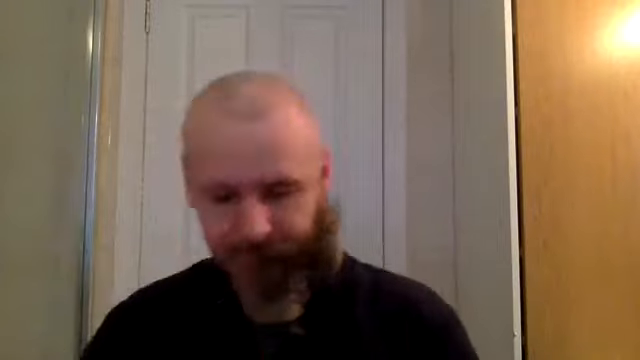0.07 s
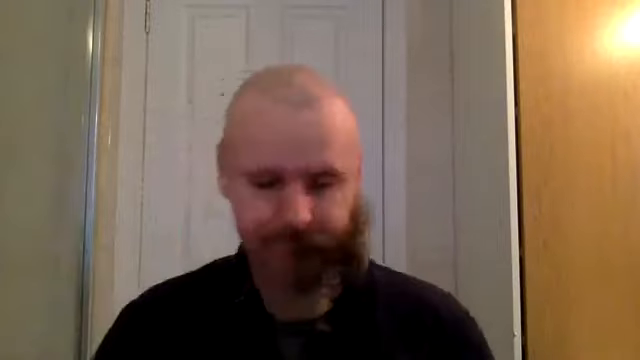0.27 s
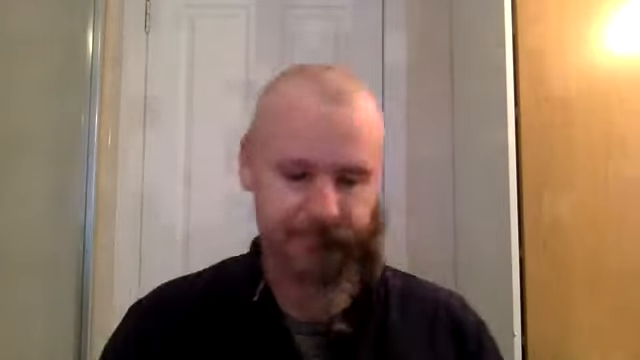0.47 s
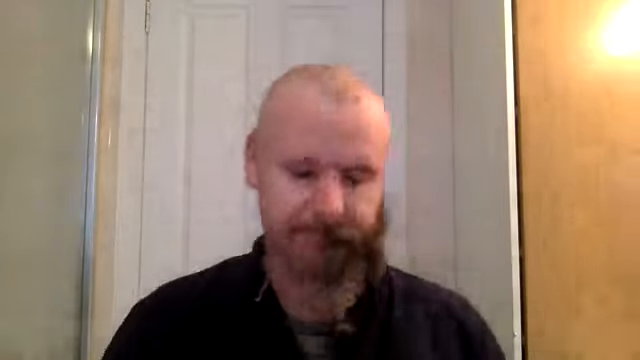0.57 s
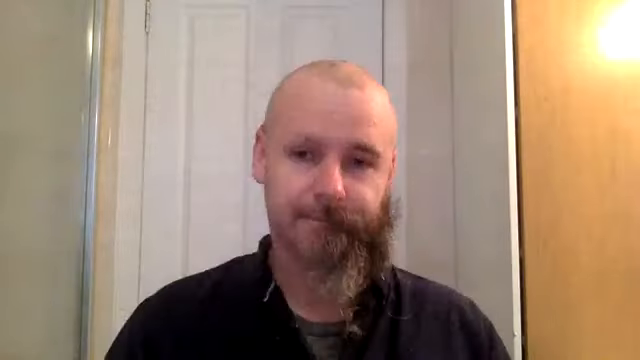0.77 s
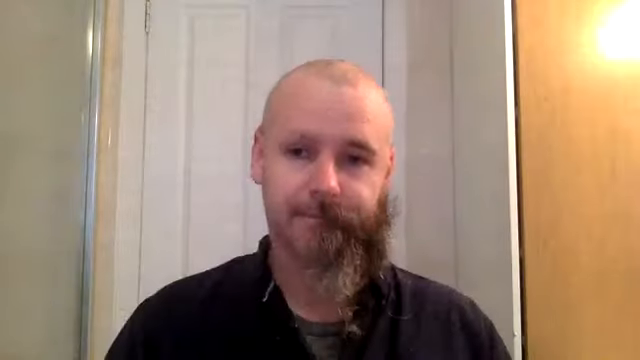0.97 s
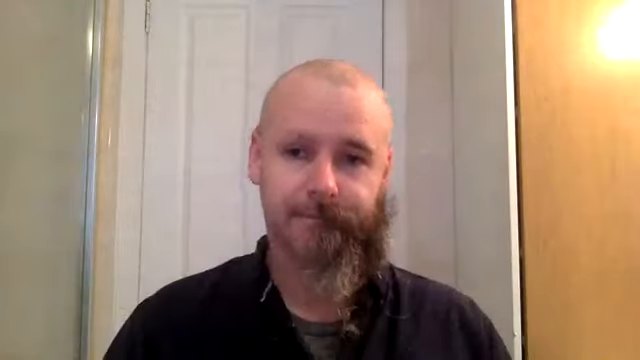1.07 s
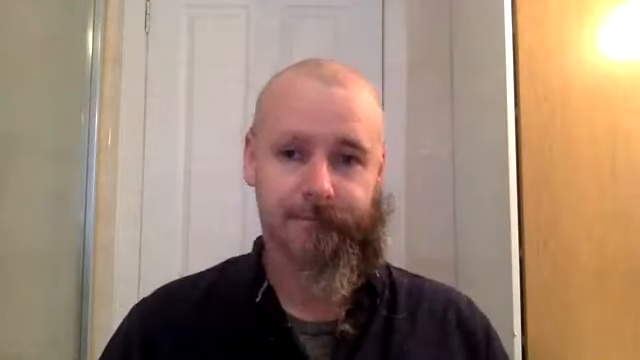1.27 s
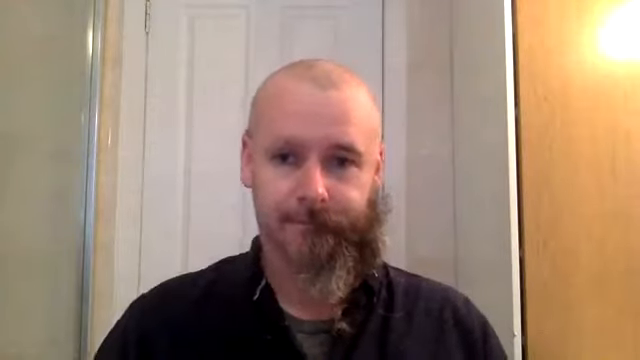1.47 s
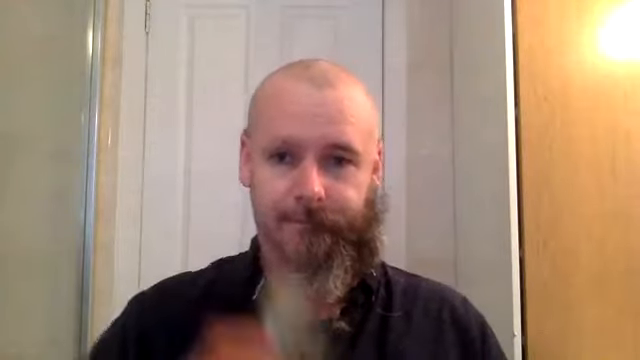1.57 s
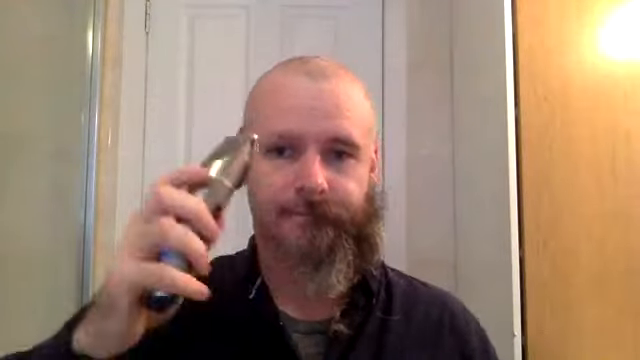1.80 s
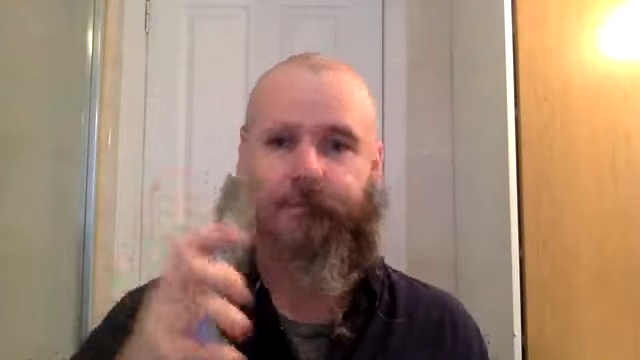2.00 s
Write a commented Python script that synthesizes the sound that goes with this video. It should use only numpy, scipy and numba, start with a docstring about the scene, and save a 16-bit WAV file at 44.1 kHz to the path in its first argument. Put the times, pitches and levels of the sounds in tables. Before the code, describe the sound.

An electric hair clipper clicks on after a quiet second and buzzes steadily in a small room

```python
"""A small room close to one microphone: hiss, hum and a thin whine, with one soft low shuffle at 0.37 s.
Just before 1 s a thumb taps a hair clipper's switch and slides it; it snaps over and rattles.
The motor starts a little slow and settles; the blade knocks at both ends of its stroke, ringing housing,
cover and steel, and the teeth hiss as they slide, over a soft motor hum.
As the clipper is lifted to the head and turned, the balance of the parts and the blade's ring wander."""
import sys
import numpy as np
from scipy import signal
from scipy.fft import rfft, irfft
from scipy.io import wavfile
from scipy.ndimage import uniform_filter1d
from numba import njit

SR = 44100
rng = np.random.default_rng(int(sys.argv[2]) if len(sys.argv) > 2 else 0)


def put_to_file(sound):
    """Save the sound as 16-bit audio at rate SR, in the file named by the first command-line argument."""
    columns = np.atleast_2d(sound).T  # one column per channel
    safe = np.clip(columns, -1, 1)
    whole_steps = np.round(safe * 32767)
    wavfile.write(sys.argv[1], SR, whole_steps.astype(np.int16))


N = 89919
T = np.arange(N) / SR  # time [s]

FLOOR_DB = -65  # rms of the background hiss
SHUFFLE_S, SHUFFLE_WIDTH_S, SHUFFLE_DB = 0.365, 0.045, -67  # centre, width, peak level
TOUCH_S, TOUCH_DB, SCRAPE_S, SCRAPE_DB = .9535, -52, .022, -61  # thumb tap; decay and level of its slide
ON_S, STROKE_HZ = 1.0001, 91.8  # motor start, full stroke rate
RUN_UP_S, SLOW_START_HZ = .15, 2.3  # settling time, how far below full rate the motor starts
RETURN_AT, RETURN_DB = .5, -15  # place of the return knock in the cycle, friction on the return stroke
JITTER_S, SCATTER_DB = 1.4e-5, 2  # random spread of knock times and strengths
LOOSE_S, SETTLE_S = 0.00015, 0.16  # extra jitter at the start, and how fast it settles
EVEN_S = .044  # window of the short-term power
LIFT_S, LIFT_TIME_S = 1.61, .035  # middle and pace of the lift
RING_WIDTH_HZ = 210  # width of the wandering blade ring
HUM_ATTACK_S = .035  # rise of the motor hum
ROOM_T60_S, ROOM_GAP_S, MOVE_S = 0.44, 0.00066, 0.221  # decay, first reflection, time between patterns
EARLY, EARLY_S = 1, 0.0075  # strength and decay of reflections off nearby things
TOP_HZ = 15800  # upper limit of the recorder

# steady background tones: (frequency [Hz], level [dB])
TONES = [(102.3, -79.5), (2924, -72.5), (3142, -79.5), (3359, -75), (3575, -79.5)]
# resonances of the sliding teeth: (frequency [Hz], relative level [dB])
TEETH = [(3000, -18), (7400, -20), (8300, -4), (9300, 7), (10300, -3), (11500, -1.5), (12400, -16),
         (13200, -7), (14100, -20), (15200, -7.5)]


def undb(db):
    """Turn decibels into an amplitude factor."""
    return 10 ** (np.asarray(db) / 20)


def unit(x):
    """Scale to rms 1."""
    return x / np.sqrt(np.mean(x ** 2) + 1e-20)


def colour(x, points):
    """Causal minimum-phase filter with the given (frequency [Hz], level [dB]) response."""
    hz, db = np.array(points, float).T
    size = 8192
    bins_hz = np.arange(size // 2 + 1) * SR / size
    gain = undb(np.interp(np.log(bins_hz + 1), np.log(hz), db))
    # folding the cepstrum makes the response start at once, as a struck body does
    cepstrum = irfft(np.log(gain))
    cepstrum[1:size // 2] *= 2
    cepstrum[size // 2 + 1:] = 0
    return signal.fftconvolve(x, irfft(np.exp(rfft(cepstrum))))[:N]


def background():
    """Coloured noise for the hiss, sines for hum and whine, and one soft low swell of noise."""
    # hiss spectrum: (frequency [Hz], relative density [dB per Hz])
    hiss_curve = [(30, -48), (70, -16), (110, -11), (200, -5.5), (600, -10), (1000, -5), (1800, -8.5),
                  (3200, -1.5), (4300, -5), (6200, -14.5), (7500, -26), (8300, -17.5), (11000, -26.5),
                  (15500, -30)]
    hiss = undb(FLOOR_DB) * unit(colour(rng.standard_normal(N), hiss_curve))
    tones = sum(undb(db) * np.sin(2 * np.pi * hz * T) for hz, db in TONES)
    low_band = [(80, -24), (190, 0), (600, -10), (1050, 0), (1600, -48)]
    shuffle = unit(colour(rng.standard_normal(N), low_band))
    swell = np.exp(-((T - SHUFFLE_S) / SHUFFLE_WIDTH_S) ** 2)
    return hiss + tones + undb(SHUFFLE_DB) * shuffle * swell


def impulses(times, sizes):
    """Sharp pushes placed between the samples as windowed sincs."""
    out = np.zeros(N)
    at = times[:, None] * SR
    index = at.astype(int) + np.arange(-7, 9)
    shape = np.sinc(index - at) * np.cos(np.pi * (index - at) / 16) ** 2
    ok = index < N
    np.add.at(out, index[ok], (sizes[:, None] * shape)[ok])
    return out


def room(x, wet_db, direct=1):
    """Direct sound plus reflections whose pattern changes as the source moves; the total power is kept."""
    t = T[:N // 4]
    tail = (undb(-60 * t / ROOM_T60_S) + EARLY * np.exp(-t / EARLY_S)) * (t > ROOM_GAP_S)
    place = np.maximum(T - ON_S, 0) / MOVE_S
    out = x * direct
    for k in range(8):
        ir = tail * rng.standard_normal(len(t))
        near = np.cos(np.pi / 2 * np.clip(place - k, -1, 1))  # crossfade between neighbouring places
        out += undb(wet_db) * signal.fftconvolve(x * near, ir / np.linalg.norm(ir))[:N]
    return out / np.sqrt(direct ** 2 + undb(wet_db) ** 2)


def switch(ring_s=.005):
    """The thumb taps the switch and slides it; it snaps over and rattles, knocking the housing."""
    # switch clicks: (time [s], level [dB], treble level relative to the click [dB])
    clicks = [(0.9915, -38, -19), (0.9995, -43, -25), (1.0165, -49, -25), (1.0225, -45, -25),
              (1.0398, -37.5, -25), (1.0595, -41, -25)]
    # resonances of switch and housing: (frequency [Hz], relative level [dB])
    switch_body = [(500, -60), (1150, -29.5), (1480, 11), (1680, 5.5), (2100, -44), (3000, -33),
                   (4200, -13), (4700, -30), (5300, -9), (6300, -38), (7600, -12.5), (8200, -47)]
    ring_norm = np.sqrt(ring_s * SR)  # levels are rms over ring_s

    scrape = unit(colour(rng.standard_normal(N), [(1300, 2), (2100, 10), (2600, 5), (4000, -9)]))
    fade = (T > TOUCH_S) * np.exp(-np.abs(T - TOUCH_S) / SCRAPE_S)
    out = undb(SCRAPE_DB) * scrape * fade

    push = impulses(np.array([TOUCH_S]), np.ones(1))
    tap = colour(push, [(900, -34), (1450, 2), (1850, 9), (2900, -22)])
    out = out + undb(TOUCH_DB) * tap / np.linalg.norm(tap) * ring_norm

    times, db, bright = np.array(clicks).T
    for points, sizes in ((switch_body, undb(db)), (TEETH, undb(db + bright))):
        ring = colour(impulses(times, sizes), points)
        out = out + ring / np.linalg.norm(ring) * np.linalg.norm(sizes) * ring_norm
    return room(out, wet_db=-6.5)


def knocks(turns, return_db):
    """The blade hits each end of its stroke, loosely at first."""
    stroke = np.arange(240) // 2
    back = np.arange(len(stroke)) % 2  # 1 on the return knock
    late, strength = rng.standard_normal((len(stroke), 2)).T
    running = T >= ON_S
    times = np.interp(stroke + RETURN_AT * back, turns[running], T[running], right=2 * T[-1])
    times = times + late * (JITTER_S + LOOSE_S * np.exp(-(times - ON_S) / SETTLE_S))
    return unit(impulses(times, undb(SCATTER_DB * strength + return_db * back)))


def rub(turns, decay, steady):
    """Sliding friction as noise, strongest just after each knock; decay is in cycles."""
    forward = np.exp(-(turns % 1) / decay)
    back = undb(RETURN_DB) * np.exp(-((turns - RETURN_AT) % 1) / decay)
    return unit((forward + back + steady) * (T > ON_S) * rng.standard_normal(N))


def even(x):
    """Hold the short-term power of a running part at 1."""
    on = 1. * (T > ON_S)
    window = int(EVEN_S * SR)
    power = uniform_filter1d(x ** 2, window)
    return on * x * np.sqrt(np.abs(uniform_filter1d(on, window)) / (np.abs(power) + 1e-12))


def part(turns, points, return_db, rub_db, wet_db, low_held_db):
    """One part rung by knocks and friction; low_held_db sets its direct sound before the lift."""
    drive = knocks(turns, return_db) + undb(rub_db) * rub(turns, decay=0.081, steady=0.17)
    still_low = (1 - np.tanh((T - LIFT_S) / LIFT_TIME_S)) / 2
    return even(room(colour(drive, points), wet_db, undb(low_held_db * still_low)))


@njit
def band(x, hz, width):
    """Band-pass (state-variable filter) with a moving centre, gain 1 there."""
    y, b, l = np.empty(len(x)), 0., 0.  # b and l: band and low states
    for i in range(len(x)):
        g, k = np.tan(np.pi * hz[i] / SR), width / hz[i]
        v = (b + g * (x[i] - l)) / (1 + g * (g + k))
        b, l, y[i] = 2 * v - b, l + 2 * g * v, k * v
    return y


def turned(x):
    """One narrow ring of the blade stands out and wanders as the clipper is turned in the hand."""
    # strongest blade ring: (time [s], frequency [Hz], emphasis [dB])
    blade_ring = [(1.04, 4690, -2), (1.12, 4080, 14), (1.17, 4000, -1), (1.25, 4490, 2.5),
                  (1.48, 4550, 15.5), (1.57, 4300, 2), (1.66, 3880, -12), (1.73, 4450, 14), (2.03, 4560, 0)]
    times, hz, db = np.array(blade_ring, float).T
    ring = band(x, np.interp(T, times, hz), float(RING_WIDTH_HZ))
    return even(x + undb(np.interp(T, times, db)) * ring)


def harmonics(turns, lines, times, levels):
    """Clean multiples of the stroke rate under one level curve."""
    tones = sum(undb(db) * np.sin(2 * np.pi * (round(k) * turns + rng.random())) for k, db in lines)
    return undb(np.interp(T, times, levels)) * tones


def clipper():
    """The motor settles to full speed and drives housing, cover, blade and teeth over a soft hum."""
    # part levels as it is lifted and turned:
    # (time [s], housing level [dB], cover level [dB], blade level [dB], teeth level [dB])
    part_levels = [(1.0, -45, -70, -60, -58), (1.028, -51, -57, -60.5, -61),
                   (1.045, -44, -60, -48.5, -54.5), (1.106, -38.5, -51, -52, -53),
                   (1.127, -43, -57.5, -44.5, -52), (1.222, -40, -47, -51, -51.5),
                   (1.26, -43, -52, -41.5, -52), (1.3, -40.5, -49, -48.5, -48.5),
                   (1.36, -41, -52, -41.5, -52), (1.464, -41, -49.5, -43.5, -49.5),
                   (1.564, -45.5, -48.5, -38, -52), (1.584, -43, -41.5, -40.5, -49.5),
                   (1.65, -44, -48.5, -36.5, -49), (1.77, -45, -48.5, -33.5, -47.5),
                   (1.946, -51, -44, -32, -56.5), (2.03, -43, -41, -29.5, -58.5)]
    # resonances of each part: (frequency [Hz], relative level [dB])
    housing_body = [(100, -59), (400, -62), (800, -34), (1150, -14.5), (1290, -12.5), (1380, 0.5),
                    (1470, -3), (1560, -0.5), (1650, 1.5), (1760, -2.5), (1950, -9.5), (2400, -44),
                    (4000, -42.5)]
    cover_body = [(1500, -32), (2000, -2), (2200, -5), (2570, 4), (2900, -4.5), (3300, -3.5), (4200, -22.5)]
    blade_body = [(2500, -43.5), (3300, -23), (3800, -5.5), (4200, -11), (4500, -10), (4950, -9.5),
                  (5450, -29), (6300, -36.5), (7300, -52), (9000, -58)]
    # motor hum: (multiple of the stroke rate, relative level [dB])
    low_lines = [(3, 2), (4, -11.5), (6, -11)]
    middle_lines = [(9, -1), (10, -2), (11, 2.5)]
    # motor hum over time: (time [s], low level [dB], middle level [dB])
    hum_levels = [(1.05, -76, -83), (1.3, -69, -72.5), (1.55, -65.5, -71.5), (1.67, -71, -59.5),
                  (1.77, -75, -67), (2.03, -73, -69.5)]
    # the stroke harmonic that meets the main housing resonance: (time [s], level [dB])
    singing_levels = [(1.03, -61), (1.11, -38), (1.16, -37), (1.21, -52), (1.29, -33.5), (1.36, -65.5),
                      (1.58, -45), (1.67, -35.5), (1.81, -43), (1.95, -55), (2.02, -36.5)]

    since = np.maximum(T - ON_S, 0)
    speed = (STROKE_HZ - SLOW_START_HZ * np.exp(-since / RUN_UP_S)) * (since > 0)
    turns = np.cumsum(speed) / SR

    housing = part(turns, housing_body, return_db=-12, rub_db=-10, wet_db=3.5, low_held_db=0)
    cover = part(turns, cover_body, return_db=-10, rub_db=-7, wet_db=8, low_held_db=-3)
    blade = turned(part(turns, blade_body, return_db=-7, rub_db=-8, wet_db=-1, low_held_db=-8))
    teeth = part(turns, TEETH, return_db=-18, rub_db=7, wet_db=5, low_held_db=1.5)
    times, *levels = np.array(part_levels).T
    parts = (housing, cover, blade, teeth)
    buzz = sum(x * undb(np.interp(T, times, db)) for x, db in zip(parts, levels))

    times, low, middle = np.array(hum_levels).T
    hum = harmonics(turns, low_lines, times, low) + harmonics(turns, middle_lines, times, middle)
    singing = harmonics(turns, [(17, 0)], *np.array(singing_levels).T)
    whirr_curve = [(60, -36), (145, 0), (190, -10), (280, 0), (600, -4), (1000, -2), (2000, -20)]
    whirr = undb(-65) * unit(colour(rng.standard_normal(N), whirr_curve))
    drone = undb(-74.0) * np.sin(2 * np.pi * TONES[0][0] * T)  # the low hum grows while the motor runs
    attack = 1 - np.exp(-(since / HUM_ATTACK_S) ** 2)
    return buzz + (hum + singing + whirr + drone) * attack


def scene():
    """Background, switch and clipper at one microphone."""
    return (background() + switch() + clipper())[None]


def record(dry):
    """The recorder cuts the top with a steep elliptic low-pass."""
    return signal.sosfilt(signal.ellip(10, .2, 70, TOP_HZ, fs=SR, output="sos"), dry)


dry = scene()
out = record(dry)
put_to_file(out)
```